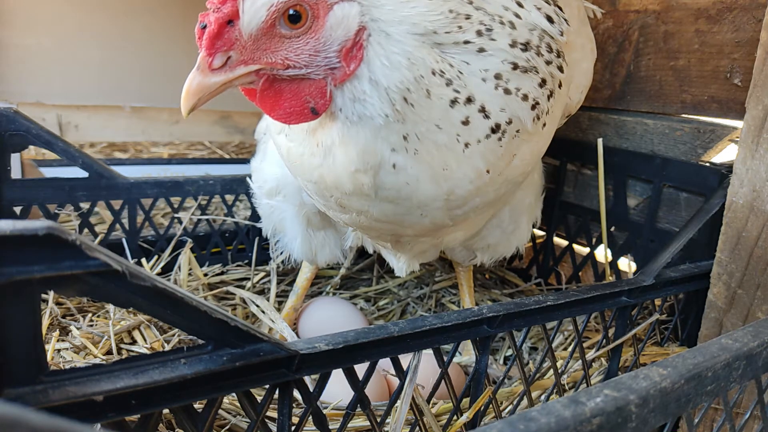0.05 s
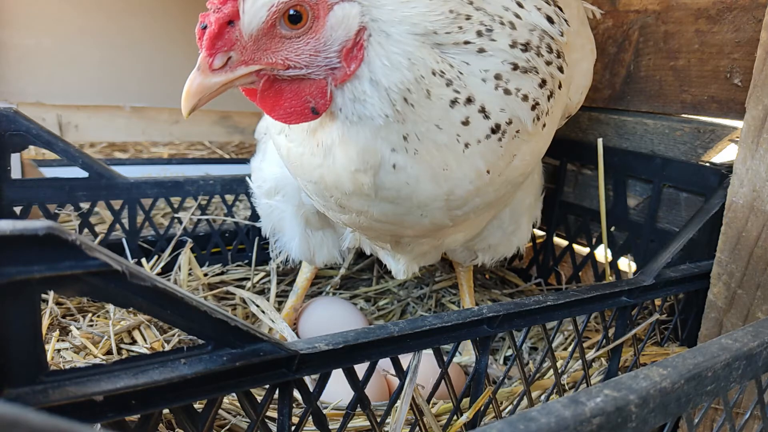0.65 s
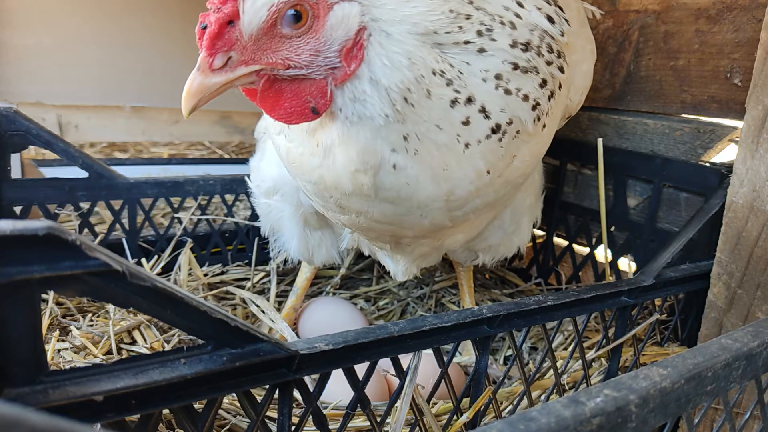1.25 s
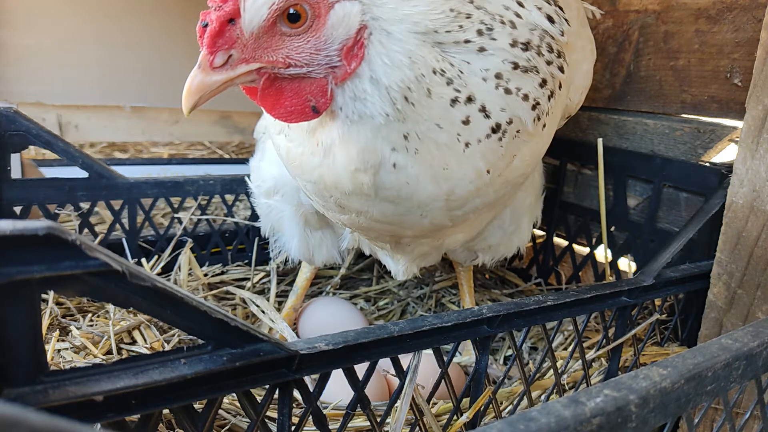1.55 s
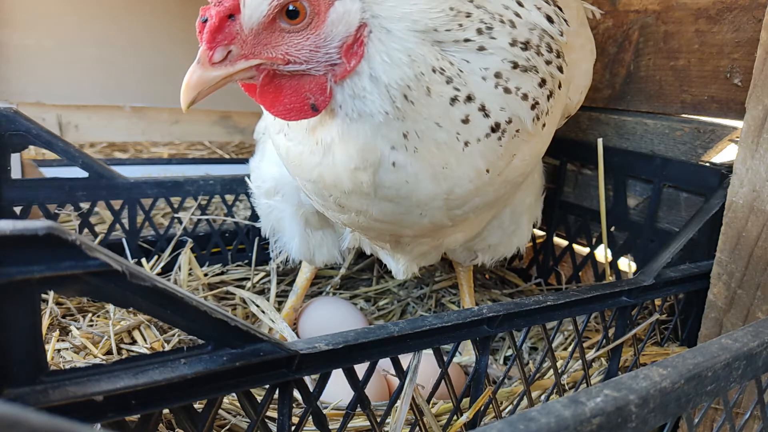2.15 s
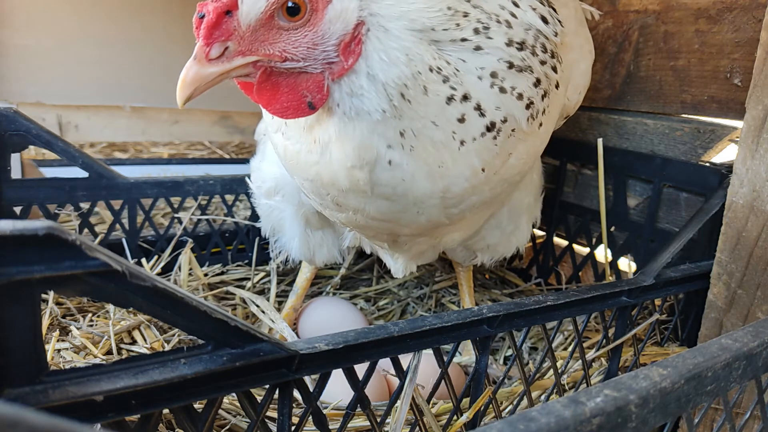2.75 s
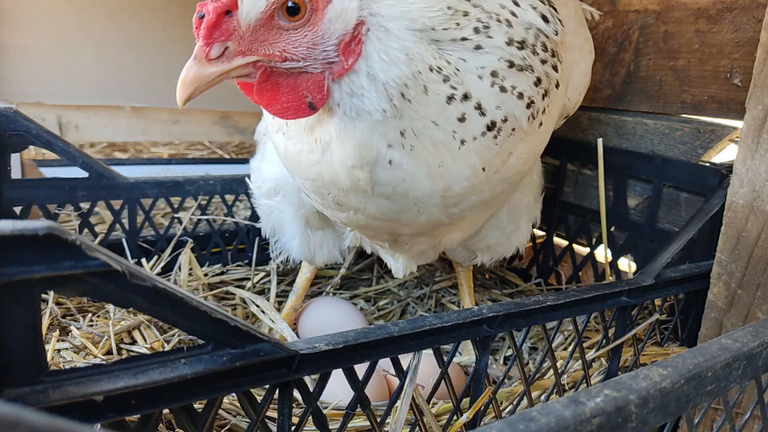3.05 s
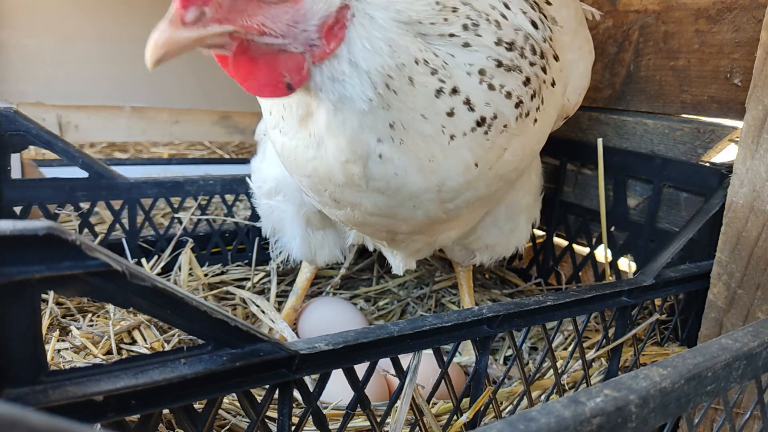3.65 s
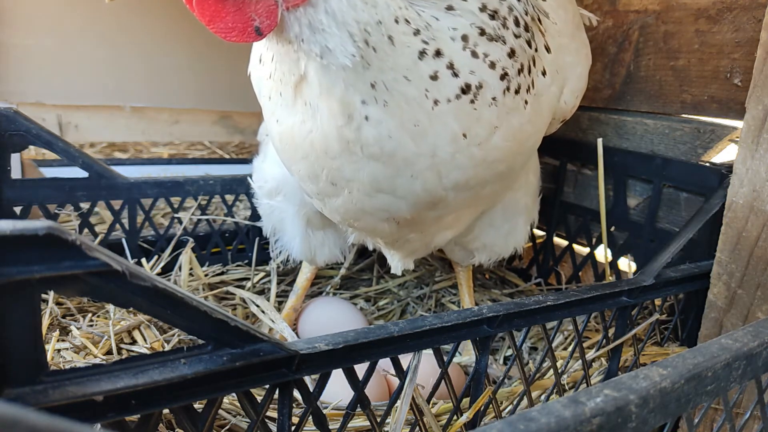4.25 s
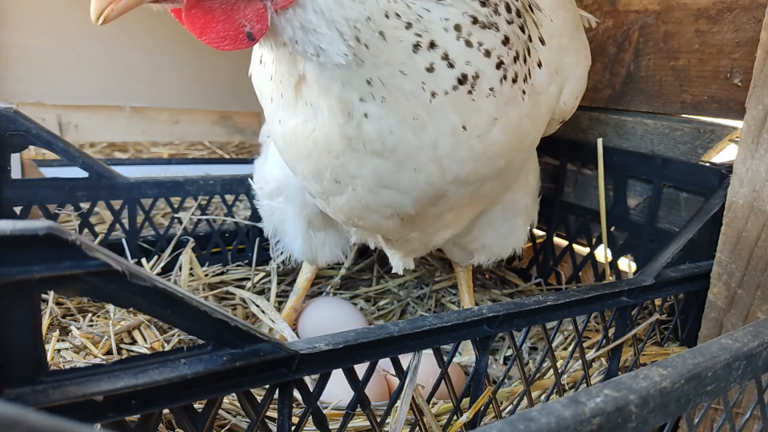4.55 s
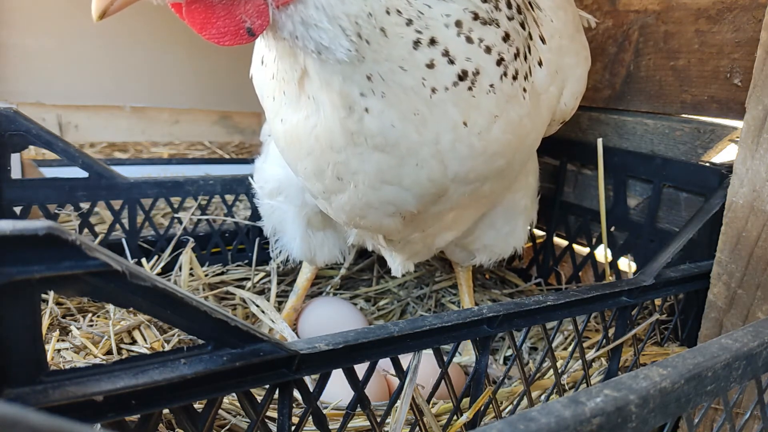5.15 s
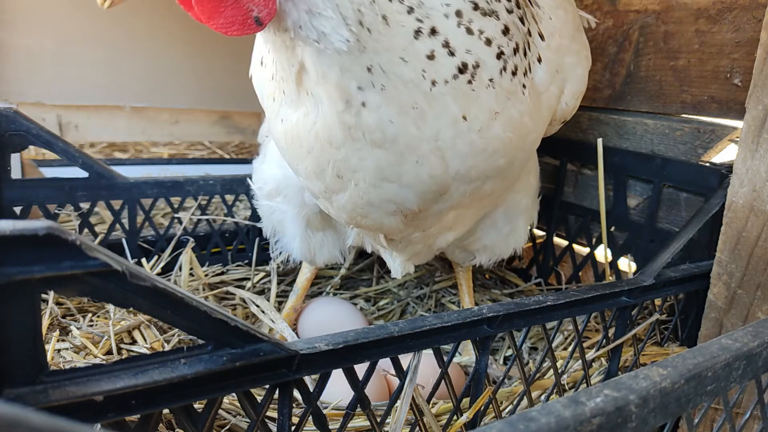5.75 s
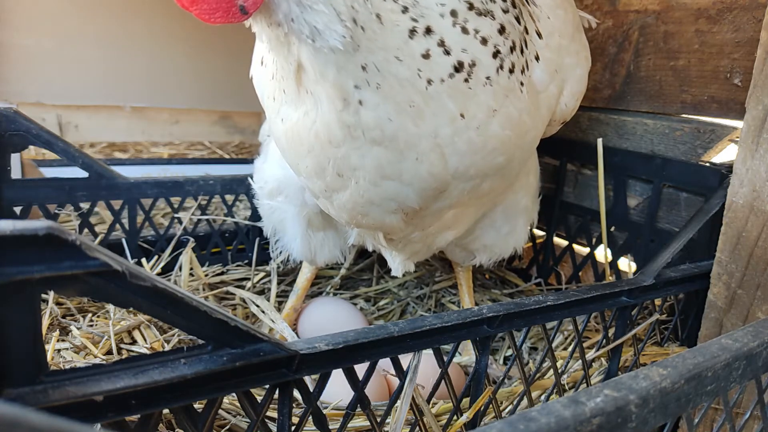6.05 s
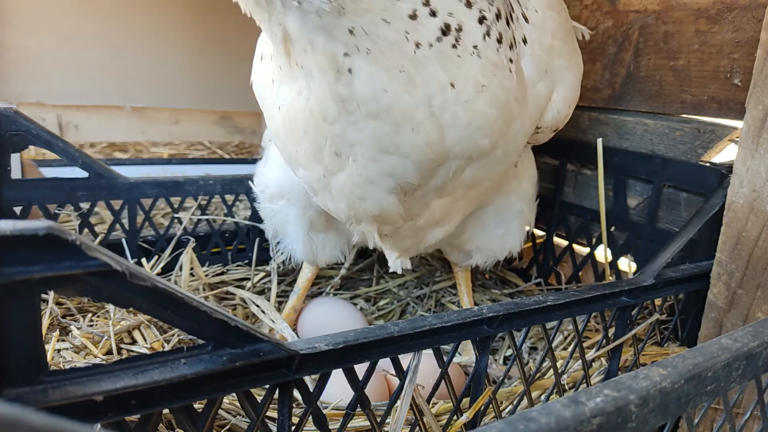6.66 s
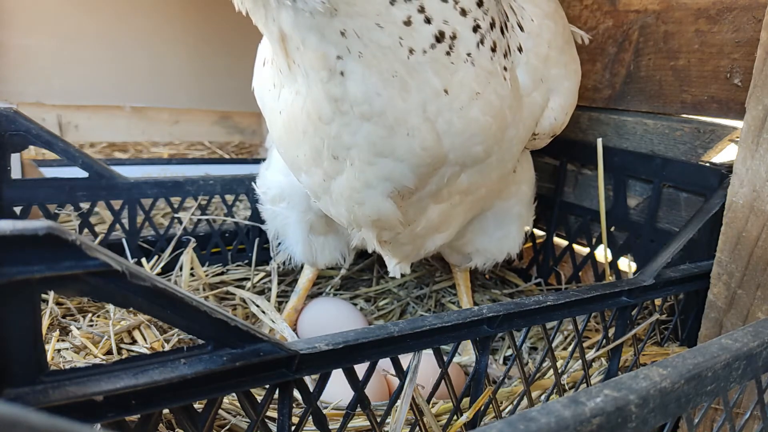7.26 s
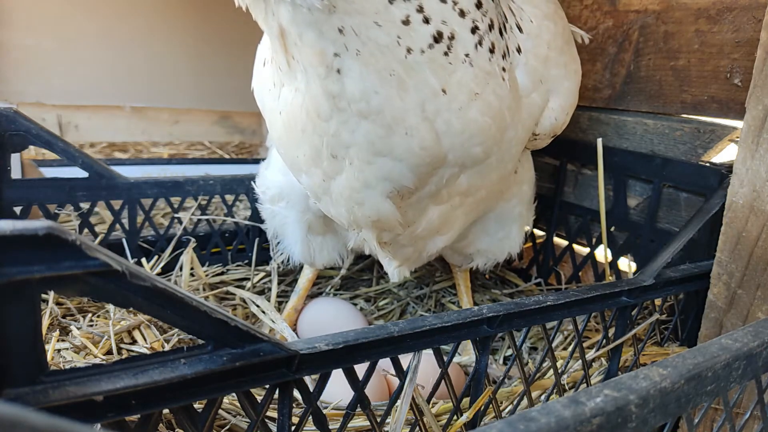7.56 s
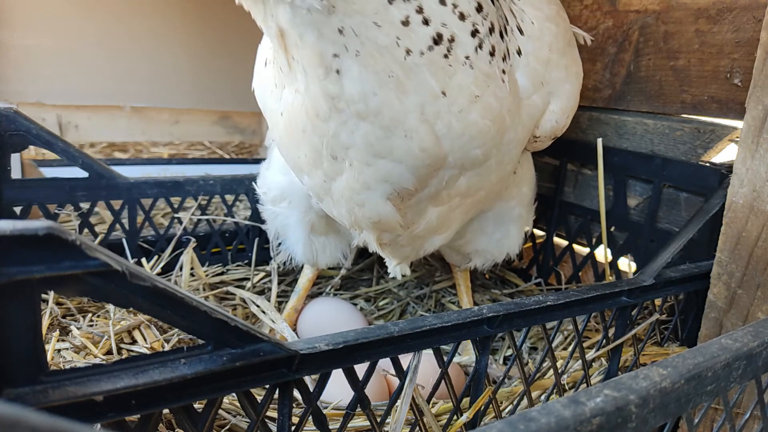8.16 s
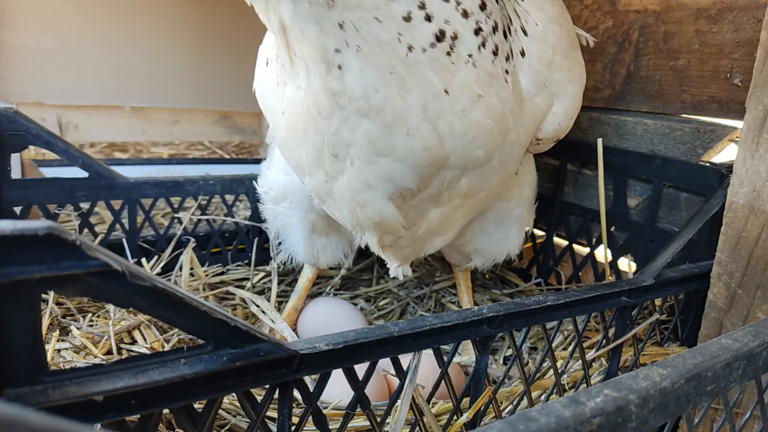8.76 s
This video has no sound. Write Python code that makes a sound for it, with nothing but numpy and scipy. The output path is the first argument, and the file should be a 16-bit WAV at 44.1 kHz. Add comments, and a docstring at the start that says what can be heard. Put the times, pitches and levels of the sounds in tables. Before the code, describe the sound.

From the start a hen clucks about five times a second, slightly left and a little way off in a wooden shed with a short echo. At 2.5 seconds she gives a louder, drawn-out call, then keeps clucking, more sparsely after 6 seconds, until about 8. A second hen, close to the microphone, joins with short, lower clucks from 3.3 to 4.8 seconds and again from 5.8. She lets out a brief, raspy cry at 6.2 seconds, and her clucks turn brighter. The first hen gives another held call at 7.2 seconds, and the near hen clucks on from 7.7 to 8.7. Small birds cheep faintly through the first five seconds, and straw ticks softly underfoot, mostly between 3.4 and 4.7. Two light puffs of air rumble on the microphone near 1.8 and 6.2 seconds. A quiet, low farmyard hum continues throughout.

```python
"""A hen clucks from the left of a wooden shed, over a farmyard murmur; a second, on her straw nest close by,
joins in. Both cluck about five times a second and break into drawn-out calls. The clucks follow the
source-filter principle: air pulses from the syrinx excite resonances of body, throat and beak. The calls
are held tones over a rasp, with the second harmonic on the throat resonance. Small birds cheep faintly,
straw ticks underfoot, and two puffs of air rumble on the microphone."""
import sys
import numpy as np
from scipy import signal
from scipy.fft import rfft, irfft, next_fast_len
from scipy.io import wavfile
from scipy.ndimage import uniform_filter1d, minimum_filter1d

SR = 44100
rng = np.random.default_rng(int(sys.argv[2]) if len(sys.argv) > 2 else 0)


def materialize(psi):
    """Save the field psi as 16-bit PCM at rate SR to the path in sys.argv[1].

    A 1-D psi becomes a single channel; in a 2-D psi each row is a channel.
    """
    bounded = np.clip(np.atleast_2d(psi).T, -1, 1)
    quanta = np.round(bounded * 32767).astype(np.int16)
    wavfile.write(sys.argv[1], SR, quanta)


N = 388521

# spectra of the shed's echo and the farmyard murmur: (frequency [Hz], relative level [dB])
SHED_SPECTRUM = [(100, -10), (250, -6.5), (850, 1), (1500, -7.5), (4000, -6.5), (8000, -10.5), (14000, -24)]
YARD_SPECTRUM = [(15, -38.5), (25, -2), (112, -17.5), (243, -5.5), (373, -21), (515, -10.5), (588, -13.5),
                 (1000, -19), (1210, -28), (1860, -27), (2300, -32.5), (5720, -41.5), (7680, -34),
                 (9770, -55.5), (15000, -54.5)]
# puffs of air on the microphone: (time [s], hold [s], level [dB])
AIR_PUFFS = [(1.81, .07, -56.5), (6.242, .18, -56.5)]
# distant birds' glides: (time [s], duration [s], start pitch [Hz], end pitch [Hz], level [dB])
BIRD_GLIDES = [(0.275, .11, 4700, 4060, -94), (.624, .16, 3220, 2830, -96), (1.908, .21, 2350, 2750, -93),
               (2.083, .17, 2900, 3350, -86.5), (5.149, .7, 454, 408, -78.5)]
# small birds' cheeps: (time [s], duration [s], level [dB])
BIRD_CHEEPS = [(.272, 0.059, -72.5), (.4, 0.089, -72.5), (.529, .04, -71), (0.985, 0.059, -73),
               (1.114, .081, -76), (1.509, 0.061, -81), (1.615, 0.12, -82), (2.32, 0.069, -80.5),
               (2.928, .05, -71.5), (3.193, 0.019, -77), (3.494, .059, -81), (3.626, 0.076, -71),
               (4.235, .11, -75.5), (5.132, 0.045, -73.5)]
# ticks in the nest: (time [s], relative level [dB])
NEST_TICKS = [(1.699, -65), (3.381, -61.5), (3.716, -65), (3.754, -65), (3.908, -63), (4.291, -65),
              (4.486, -61), (4.646, -59.5)]

# far hen's clucks: (time [s], relative throat level [dB])
FAR_HEN_CLUCKS = [(-.045, -50.5), (.156, -47.5), (.353, -40), (.553, -44.5), (0.749, -37), (.951, -39.5),
                  (1.152, -45.5), (1.357, -46), (1.561, -45), (1.77, -44.5), (1.993, -45.5), (2.211, -44.5),
                  (2.418, -41), (2.874, -36.5), (3.037, -36), (3.257, -39), (3.526, -47), (3.817, -49.5),
                  (4.088, -49), (4.329, -41), (4.544, -45.5), (4.749, -39.5), (4.955, -40.5),
                  (5.157, -38.5), (5.36, -44.5), (5.567, -45.5), (5.779, -42.5), (5.988, -42), (6.205, -50),
                  (6.481, -54), (6.705, -48), (7.15, -39.5), (7.624, -39.5), (7.793, -35.5), (8.052, -40)]
# near hen's clucks: (time [s], duration [s], top pitch [Hz], body level [dB],
# beak level [dB re body], roughness [0-1])
NEAR_HEN_CLUCKS = [(2.397, 0.035, 340, -47, -3, 0.03), (3.268, 0.03, 327, -39, -5.5, 0.04),
                   (3.454, 0.038, 324.6, -38, -16, 0), (3.64, .038, 320.3, -37.5, -11, .3),
                   (3.801, 0.044, 292, -36, -19, .3), (3.987, 0.042, 200, -36, -13.5, 0.09),
                   (4.182, .049, 197, -36, -12.5, .15), (4.386, .047, 336.3, -34.5, -4, .3),
                   (4.571, 0.049, 180.1, -37, -9.5, 0.04), (4.761, 0.045, 181.5, -37, -7, .05),
                   (5.778, 0.035, 178.2, -38, -5.5, .05), (5.96, 0.036, 190.5, -36, -3.5, 0),
                   (6.144, 0.043, 192.1, -35.5, -2, 0.04), (6.573, .046, 244.3, -35.5, 6, .2),
                   (6.747, .038, 257.4, -32.5, 2.5, .05), (6.911, .047, 265.3, -34, 3, .2),
                   (7.11, .044, 212.2, -34, 1.5, 0), (7.74, 0.044, 162.6, -40.5, 0.5, 0),
                   (7.937, 0.039, 202.8, -34, -.5, 0.11), (8.145, 0.046, 206.4, -34, 1, 0.01),
                   (8.336, 0.046, 202.5, -33.5, -.5, 0.11), (8.525, 0.043, 224, -34, 2, 0.09),
                   (8.707, 0.046, 226.3, -34, 2.5, 0.08)]
# resonances of the hens in clucks and calls: (frequency [Hz], bandwidth [Hz], gain [dB])
FAR_BODY_MODES = [(233, 120, -2.5), (485.5, 62, -3)]
FAR_THROAT_MODES = [(800.6, 56, -6), (979, 195, 4), (1220, 70, -17), (1846, 143, -11)]
FAR_RASP_MODES = [(2700, 2500, -3.5), (3620, 650, 0.5), (4320, 700, -5), (7570, 1280, 2),
                  (12140, 1300, -26.5)]
FAR_CALL_MODES = [(910, 180, 6), (1237, 140, 17), (1820, 540, 7.5), (2150, 300, -15.5), (2770, 550, 2.5),
                  (3990, 320, 0), (4804, 220, 0), (6530, 500, -2.5), (7990, 970, -3.5), (10200, 390, -18.5)]
NEAR_BODY_MODES = [(208.6, 70, -2), (387, 183, -0.5), (565.3, 227, 5)]
NEAR_BEAK_MODES = [(950, 130, -10), (1059, 100.6, 12.5), (1410, 150, -37), (1774, 260, -5.5)]
NEAR_RASP_MODES = [(2062, 430, -9.5), (2770, 230, -2.5), (3418, 326, 3.5), (5030, 550, -2.5),
                   (5740, 450, -8), (7070, 740, -2.5), (8460, 570, -7), (10600, 4500, -32.5)]
NEAR_CALL_MODES = [(730, 510, 3.5), (1220, 170, -2), (2130, 650, -2.5), (3454, 550, 5), (3860, 390, 0),
                   (5000, 820, -3), (6100, 450, 1.5), (7600, 1700, -1), (10200, 980, -14),
                   (12470, 3700, -19.5)]
# drawn-out calls: (time [s], duration [s], pitch [Hz], relative level [dB])
FAR_LONG_CALLS = [(2.513, 0.398, 513.7, -27.5), (7.242, .412, 517.2, -27.5)]
NEAR_LONG_CALL = (6.244, 0.2582, 555, -28)
# partials of the calls: (frequency [multiple of the pitch], relative level [dB])
FAR_CALL_PARTIALS = [(1, -23.5), (2, 2), (3, -32.5), (4, -25), (6, -38)]
NEAR_CALL_PARTIALS = [(.5, -25.5), (1, -0.5), (1.5, -16), (2, 6.5), (2.5, -26.5), (3, -25), (4, -27),
                      (6, -31), (7, -22.5)]
# antiresonances of the windpipe in the calls: (frequency [Hz], bandwidth [Hz])
FAR_ANTIRESONANCES = [(3420, 320), (5650, 210)]
NEAR_ANTIRESONANCES = [(2650, 220), (4270, 370)]


def undb(db):
    """Amplitude ratio: a factor of ten for every 20 dB."""
    return 10 ** (np.asarray(db) / 20)


def level(x, db=0):
    """Normalisation to an rms level."""
    return x * undb(db) / np.sqrt(np.mean(x ** 2) + 1e-20)


def add(out, start, x):
    """Superposition: a sound joins the mix at a start time in seconds."""
    i = int(start * SR)
    x = x[max(-i, 0):N - i]
    out[max(i, 0):max(i, 0) + len(x)] += x


def wander(n, rate):
    """Random modulation: linear interpolation between unit Gaussian values, rate of them a second."""
    at = np.arange(n) * rate / SR
    count = int(at[-1]) + 2
    return np.interp(at, np.arange(count), rng.standard_normal(count))


def ring(x, modes):
    """Resonance: parallel band-pass filters, each applied twice to deepen the valleys."""
    out = 0
    for hz, width, db in modes:
        b, a = signal.iirpeak(min(hz, SR / 2 - 1), hz / width, fs=SR)
        out = out + undb(db) * signal.lfilter(b, a, signal.lfilter(b, a, x))
    return out


def colour(x, points):
    """Spectral shaping by (frequency [Hz], gain [dB]) points, joined on a logarithmic frequency axis."""
    n = x.shape[-1]
    size = next_fast_len(n)
    hz, db = np.transpose(points)
    bin_hz = np.arange(size // 2 + 1) * SR / size
    gain = undb(np.interp(np.log(bin_hz + 1), np.log(hz), db))
    return irfft(rfft(x, size) * gain, size)[..., :n]


def place(x, pan_db, lag_ms, treble_pan_db, scatter_db):
    """Localisation by level and time difference (positive is left); nearby boards scatter the treble."""
    treble = signal.sosfiltfilt(signal.butter(2, 4500, "high", fs=SR, output="sos"), x)
    left, right = ((x - treble) * undb(side * pan_db / 2) + treble * undb(side * treble_pan_db / 2)
                   for side in (1, -1))
    right = np.interp(np.arange(N) - lag_ms * SR / 1000, np.arange(N), right)
    t = np.arange(SR // 50) / SR
    reflections = rng.standard_normal((2, len(t))) * np.exp(-t / .0063)
    boards = signal.sosfilt(signal.butter(3, 1800, "high", fs=SR, output="sos"), reflections)
    boards *= undb(scatter_db) / np.sqrt(np.sum(boards ** 2, axis=1, keepdims=True))
    return np.array([left, right]) + signal.fftconvolve(x[None], boards, axes=1)[:, :N]


def shed(x, shed_t60=.42, straw_t60=.11, straw_db=3):
    """Reverberation: the straw-lined corner answers briefly; a weaker, duller echo hangs in the shed."""
    t = np.arange(SR // 2) / SR
    onset = np.minimum(t / .0031, 1)
    early, late = (rng.standard_normal((2, len(t))) * np.exp(-np.log(1000) * t / t60) * onset
                   for t60 in (straw_t60, shed_t60))
    corner = undb(straw_db) * early / np.linalg.norm(early[0])
    room = colour(late / np.linalg.norm(late[0]), SHED_SPECTRUM)
    return signal.fftconvolve(x[None], corner + room, axes=1)[:, :N]


def yard():
    """Partial coherence: the restless farmyard murmur is partly common to both channels."""
    common = colour(rng.standard_normal(N), YARD_SPECTRUM)
    separate = colour(rng.standard_normal((2, N)), YARD_SPECTRUM)
    swell = undb(1.3 * wander(N, 4.9) + wander(N, 4.2))
    return level(common + 1.2 * separate, -71) * swell * undb([[1.5], [-1.5]])


def air_puffs(attack_s=.03, fade_db_per_s=65.5):
    """Turbulence at the microphone: a rumble, independent in each channel, rises, holds and fades."""
    t = np.arange(N) / SR
    spectrum = [(15, -16), (35, 5.5), (80, -8.5), (200, -14), (700, -25.5), (2000, -67)]
    rumble = level(colour(rng.standard_normal((2, N)), spectrum))
    strength = np.zeros(N)
    for start, hold, db in AIR_PUFFS:
        rise = np.clip((t - start) / attack_s, 0, 1)
        strength += rise * undb(db - fade_db_per_s * np.maximum(t - start - hold, 0))
    return rumble * strength


def bird_note(pitch, flutter_db, flutter_rate, taper):
    """Amplitude modulation: a sine follows the pitch while its level flutters, tapered at both ends."""
    n = len(pitch)
    tone = np.sin(2 * np.pi * np.cumsum(pitch) / SR)
    return tone * undb(flutter_db * wander(n, flutter_rate)) * signal.windows.tukey(n, taper)


def whistles():
    """Frequency sweeps: faint, fluttering glides of distant birds."""
    out = np.zeros(N)
    for start, length, start_hz, end_hz, db in BIRD_GLIDES:
        n = int(length * SR)
        pitch = np.linspace(start_hz, end_hz, n) * (1 + .012 * wander(n, 250))
        add(out, start, level(bird_note(pitch, flutter_db=3, flutter_rate=59, taper=.6), db))
    return out


def cheeps(centre_hz=7520):
    """Frequency modulation: a fast tremble on an arching pitch makes the small birds' cheeps buzz."""
    out = np.zeros(N)
    for start, length, db in BIRD_CHEEPS:
        n = int(length * SR)
        arch = np.sin(np.linspace(.8, np.pi, n)) - .6
        pitch = centre_hz * (1 + .014 * arch + .043 * wander(n, 530))
        add(out, start, level(bird_note(pitch, flutter_db=4.5, flutter_rate=200, taper=.5), db))
    return out


def nest_ticks(attack_s=.0035, decay_s=.0058, trim_db=-7):
    """Impact excitation: the hen's feet draw dull, damped knocks from straw and crate."""
    out = np.zeros(N)
    t = np.arange(SR // 25) / SR
    press = np.minimum(t / attack_s, 1) * np.exp(-t / decay_s)
    modes = [(580, 400, 11), (1050, 400, -8), (2200, 2000, -16.5)]
    for start, db in NEST_TICKS:
        knock = ring(rng.standard_normal(len(t)) * press, modes)
        add(out, start - .003, level(knock, db + trim_db))
    return out


def syrinx(hz, jitter, shimmer_db, air):
    """Valved airflow: each cycle gives an uneven pulse, then turbulence; returns clean and breathy flow."""
    n = len(hz)
    phase = np.cumsum(hz * (1 + jitter * wander(n, 300))) / SR + rng.random()
    cycle = np.round(phase).astype(int)
    offset_samples = (phase - cycle) * SR / hz
    size = undb(shimmer_db * rng.standard_normal(cycle[-1] + 1))[cycle]
    pulses = level(size * np.sinc(offset_samples) * np.exp(-(offset_samples / 10) ** 2))
    turbulence = level(np.exp(-(phase % 1) / .39) * rng.standard_normal(n))
    return pulses + air * turbulence, .16 * pulses + turbulence


def voiced(flow, envelope, modes, db, vowel=1):
    """Source and filter: a burst of flow rings resonances, shifted by the beak's shape (vowel factor)."""
    burst = np.pad(flow * envelope, (0, SR // 32))
    sound = ring(burst, [(hz * vowel, width, gain_db) for hz, width, gain_db in modes])
    return sound * undb(db) / np.sqrt(np.mean(sound[:len(flow)] ** 2))


def far_clucks(length_s=.063, low_hz=263, break_hz=333, break_db=-41):
    """Register break: soft clucks arch; forced ones jump up, and their third harmonic rings the throat."""
    out = np.zeros(N)
    u = np.linspace(0, 1, int(length_s * SR))
    arch = low_hz * np.interp(u, [0, .25, .5, .75, 1], [.74, .94, 1.01, 1, .45])
    push = np.interp(u, [0, .25, .7, 1], [.4, .95, .95, .14])
    for start, throat_db in FAR_HEN_CLUCKS:
        force_db = throat_db - break_db
        broken = (force_db > 0) * np.interp(u, [.38, .46, .7, 1], [.098, .94, 1, .3])
        pitch = (arch + (break_hz - low_hz) * broken) * (1 + .015 * rng.standard_normal())
        # atop the arch the fourth harmonic overshoots the throat resonance, so the level sags
        sag = .5 * np.exp(-((u - .5) / .073) ** 2) * (1 - broken)
        throat_push = push * (1 - sag + 1.5 * broken)
        flow, breathy = syrinx(pitch, jitter=.026, shimmer_db=1.8, air=.36)
        throat_vowel = 1.0077 + .018 * rng.standard_normal()
        rasp_vowel = 1 + .05 * rng.standard_normal()
        add(out, start - .003, voiced(flow, push, FAR_BODY_MODES, db=-57.5))
        add(out, start - .002, voiced(flow, throat_push, FAR_THROAT_MODES, throat_db, throat_vowel))
        add(out, start, voiced(breathy, push ** 2.8, FAR_RASP_MODES, -68 + .5 * force_db, rasp_vowel))
    return out


def near_clucks(shut_rasp_db=-21.5, open_rasp_db=-14):
    """Formants: the opening beak brings out the 1 kHz resonance and the rasp while the pitch arches."""
    out = np.zeros(N)
    for start, length, top_hz, body_db, beak_db, rough in NEAR_HEN_CLUCKS:
        u = np.linspace(0, 1, int(length * SR))
        pitch = top_hz * np.interp(u, [0, .3, .55, .8, 1], [.67, .92, 1, .99, .88])
        push = np.interp(u, [0, .25, .55, .78, 1], [.15, .57, 1, .81, .043])
        # the rasp stays faint until the beak opens wide, then grows with it
        rasp_db = body_db + max(shut_rasp_db, open_rasp_db + 1.31 * beak_db)
        flow, breathy = syrinx(pitch, jitter=.012 + .6 * rough, shimmer_db=1 + 8 * rough, air=.2)
        beak_vowel = 1 + .036 * rng.standard_normal()
        rasp_vowel = 1 + .018 * rng.standard_normal()
        add(out, start - .002, voiced(flow, push, NEAR_BODY_MODES, body_db))
        add(out, start, voiced(flow, push ** 1.2, NEAR_BEAK_MODES, body_db + beak_db, beak_vowel))
        add(out, start, voiced(breathy, push ** 1.63, NEAR_RASP_MODES, rasp_db, rasp_vowel))
    return out


def call_gesture(length, fall, attack_s=.011, release_s=.038, sag_db_per_s=1, pitch_per_db=.007):
    """Driving pressure: a harder push raises level and pitch; returns push, relative pitch, roughness."""
    t = np.arange(int(length * SR)) / SR
    waver_db = .8 * wander(len(t), 26)
    attack = np.minimum(t / attack_s, 1)
    release = np.minimum((length - t) / release_s, 1)
    push = attack * undb(waver_db - sag_db_per_s * t) * release  # sags as the air runs out
    scoop = .045 * np.exp(-t / .042) * np.cos(2 * np.pi * 17 * t)  # starts flat, overshoots, settles
    bend = 1 + pitch_per_db * waver_db - scoop - fall * (1 - release)
    # hoarse until the voice catches, and again as it tires
    catching = .45 * np.exp(-t / .025)
    tiring = .7 * np.exp((t / length - 1) / .12)
    return push, bend, .1 + catching + tiring


def long_call(call, partials, rasp_modes, notches, *, fall, beat_hz, beat_depth, jitter, air,
              tone_db, rasp_db, rasp_power):
    """Sidebands: the syrinx's second side modulates a held tone and rasp; hoarseness adds a stutter."""
    out = np.zeros(N)
    start, length, pitch_hz, db = call
    push, bend, rough = call_gesture(length, fall)
    n = len(push)
    hz = pitch_hz * bend * (1 + .0066 * wander(n, 9.7) + .072 * rough * wander(n, 250))
    phase = 2 * np.pi * np.cumsum(hz) / SR
    tone = np.zeros(n)
    for multiple, partial_db in partials:
        flicker_db = 2.2 * wander(n, 40) * (multiple != 2)
        tone += undb(partial_db + flicker_db) * np.sin(multiple * phase + 2 * np.pi * rng.random())
    second_hz = beat_hz * (1 + .084 * wander(n, 120))
    second_side = np.sin(2 * np.pi * np.cumsum(second_hz) / SR)
    stutter = (1 + rough * wander(n, 170)) / np.sqrt(1 + rough ** 2)
    tone = push * level(tone, tone_db) * (1 + beat_depth * second_side) * stutter
    flow, _ = syrinx(hz, jitter, shimmer_db=2.2, air=air)
    rasp = ring(flow * (1 + .73 * second_side), rasp_modes)
    for notch_hz, width in 2 * notches:  # each notch acts twice
        rasp = signal.lfilter(*signal.iirnotch(notch_hz, notch_hz / width, fs=SR), rasp)
    rasp = push ** rasp_power * undb(.9 * wander(n, 60)) * level(rasp, rasp_db)
    add(out, start, undb(db) * (tone + rasp))
    return out


def scene():
    """Superposition of direct sound, the shed's reverberation and the background."""
    near = near_clucks() + nest_ticks()
    cry = long_call(NEAR_LONG_CALL, NEAR_CALL_PARTIALS, NEAR_CALL_MODES, NEAR_ANTIRESONANCES,
                    fall=.15, beat_hz=276, beat_depth=.12, jitter=.017, air=.34,
                    tone_db=2, rasp_db=-8.5, rasp_power=1.9)
    far = far_clucks()
    for call in FAR_LONG_CALLS:
        far += long_call(call, FAR_CALL_PARTIALS, FAR_CALL_MODES, FAR_ANTIRESONANCES,
                         fall=.03, beat_hz=200, beat_depth=.055, jitter=.0097, air=.24,
                         tone_db=2.5, rasp_db=-18, rasp_power=.67)
    birds = cheeps() + whistles()
    direct = place(near, pan_db=6, lag_ms=.032, treble_pan_db=-4, scatter_db=-2.5)
    # the near hen lifts her head for her cry, which reaches both channels almost alike
    direct += place(cry, pan_db=.5, lag_ms=0, treble_pan_db=2, scatter_db=3.5)
    direct += place(far, pan_db=5.5, lag_ms=.35, treble_pan_db=-2, scatter_db=1) * undb(1.5)
    direct += place(birds, pan_db=-1, lag_ms=.01, treble_pan_db=-12, scatter_db=-1)
    echo = shed(undb(-31.5) * (near + cry) + undb(-22) * far + undb(-8.5) * birds)
    return direct + echo + yard() + air_puffs()


def record(dry, ceiling=.24, cutoff_hz=15300):
    """Peak and band limiting: a fast gain dip holds loud calls down, and a low-pass cuts the top."""
    window = SR // 150
    gain = np.minimum(1, ceiling / (np.abs(dry).max(axis=0) + 1e-9))
    gain = uniform_filter1d(minimum_filter1d(gain, window), window)
    return signal.sosfilt(signal.ellip(8, .2, 70, cutoff_hz, fs=SR, output="sos"), dry * gain)


dry = scene()
out = record(dry)
materialize(out)
```